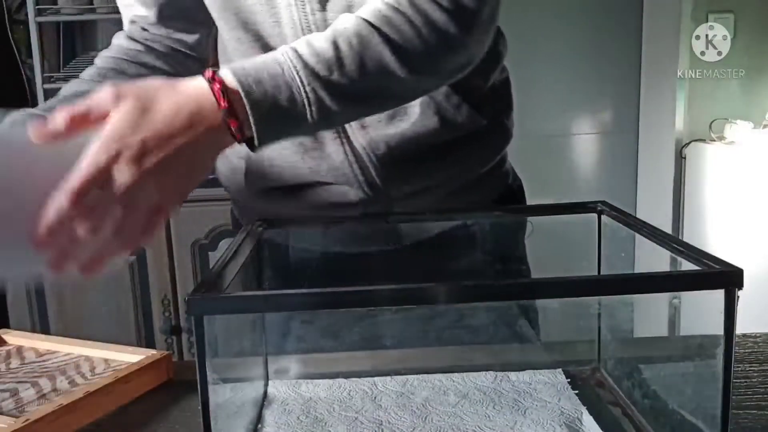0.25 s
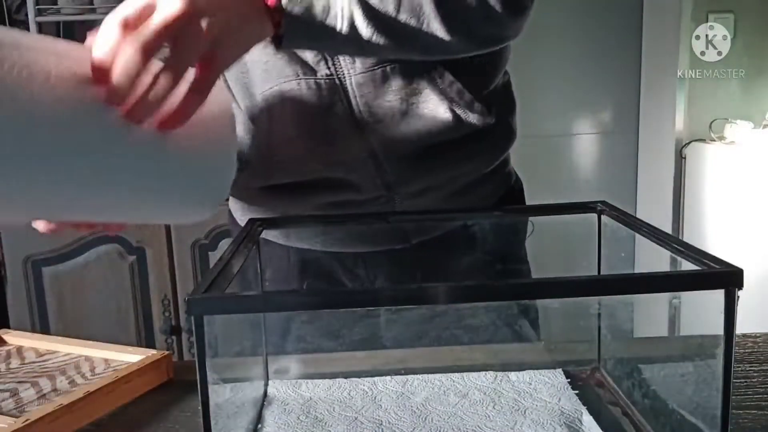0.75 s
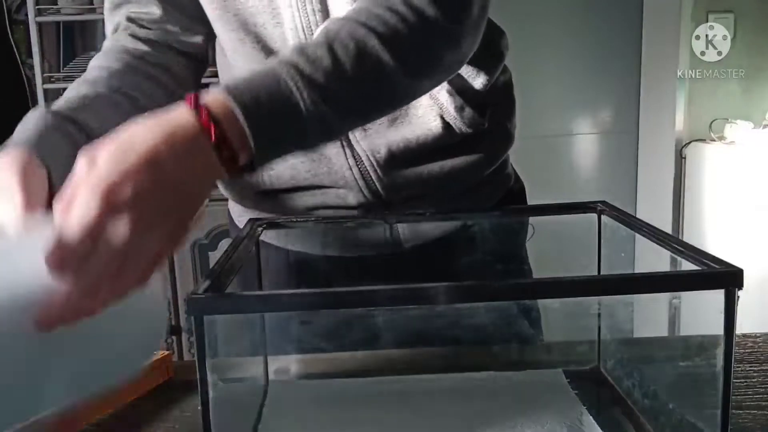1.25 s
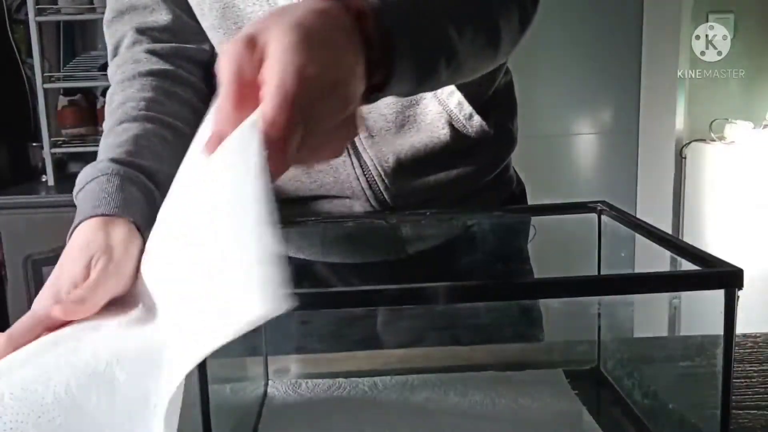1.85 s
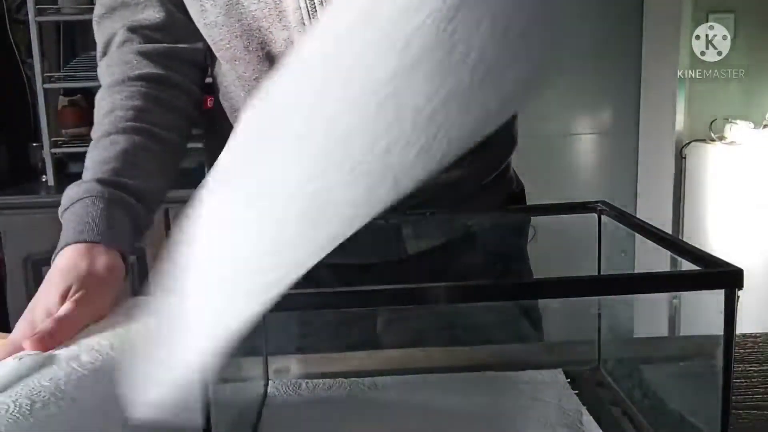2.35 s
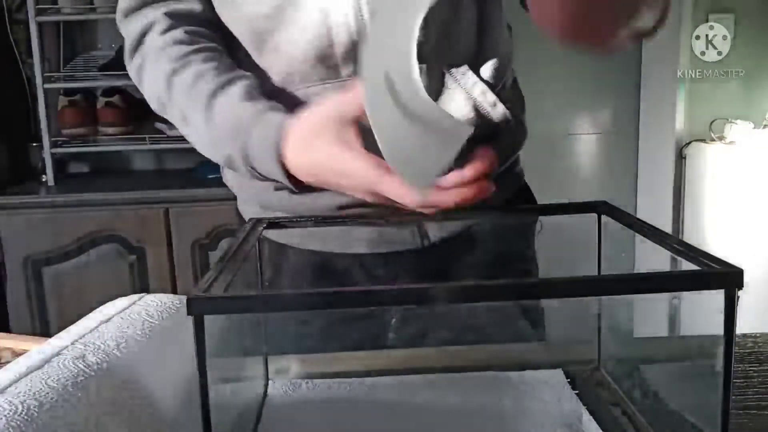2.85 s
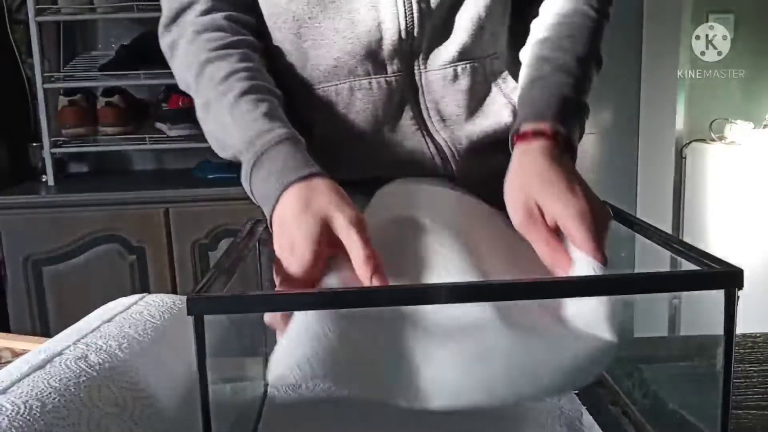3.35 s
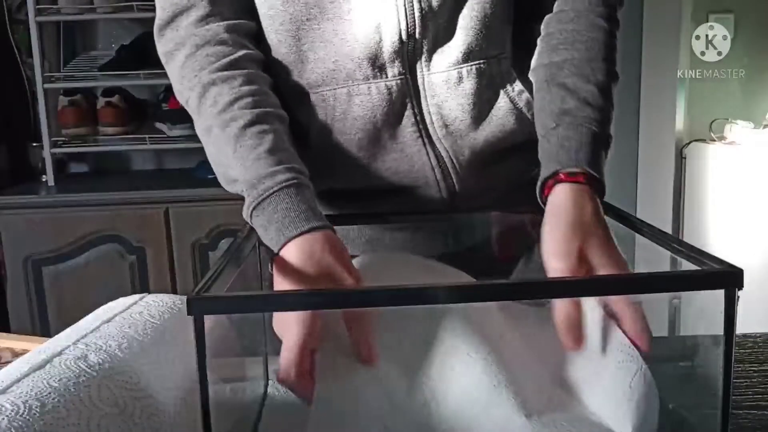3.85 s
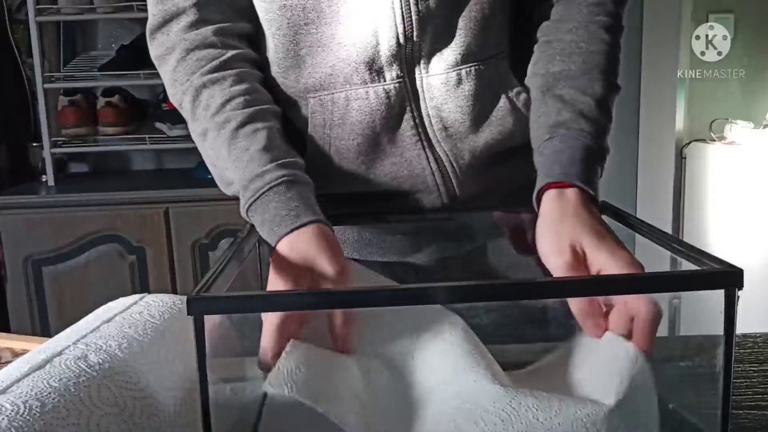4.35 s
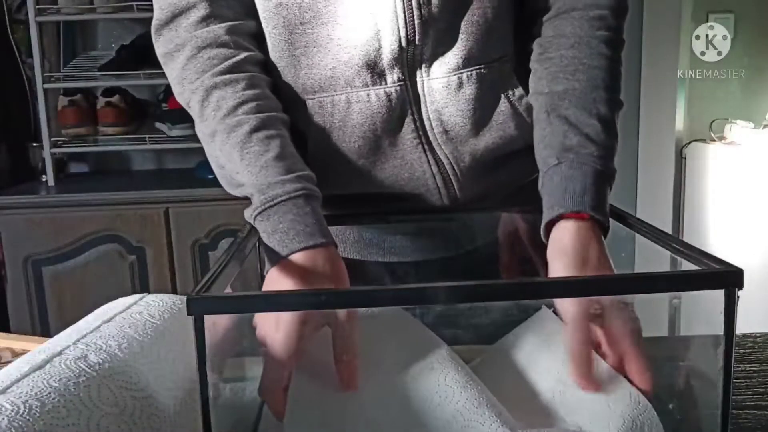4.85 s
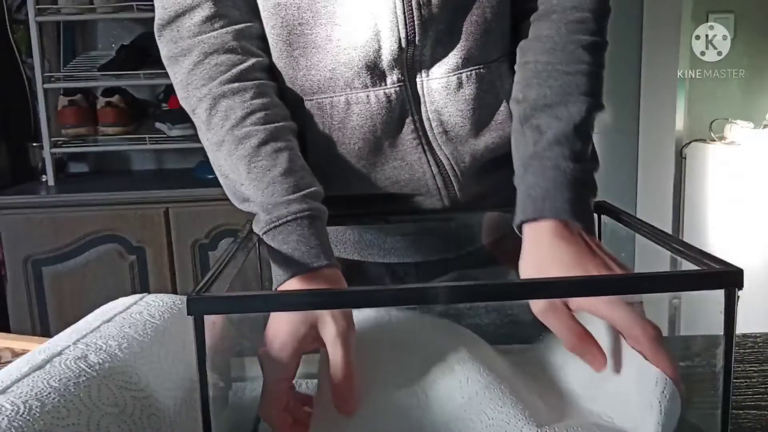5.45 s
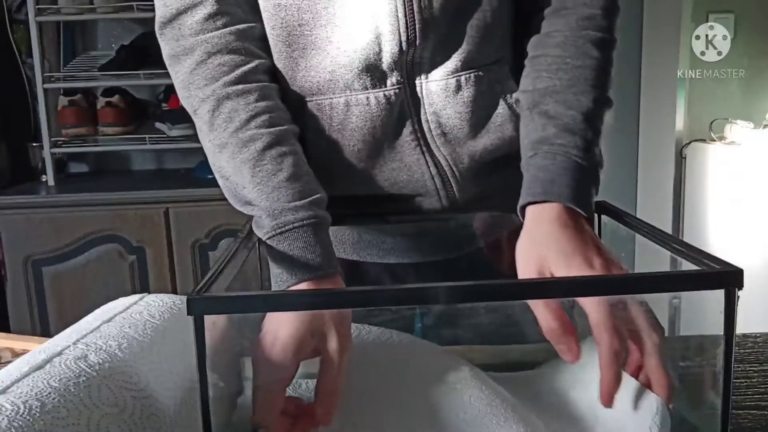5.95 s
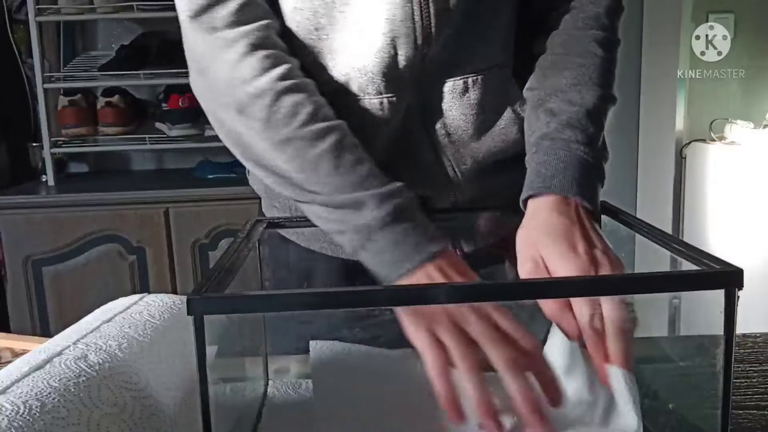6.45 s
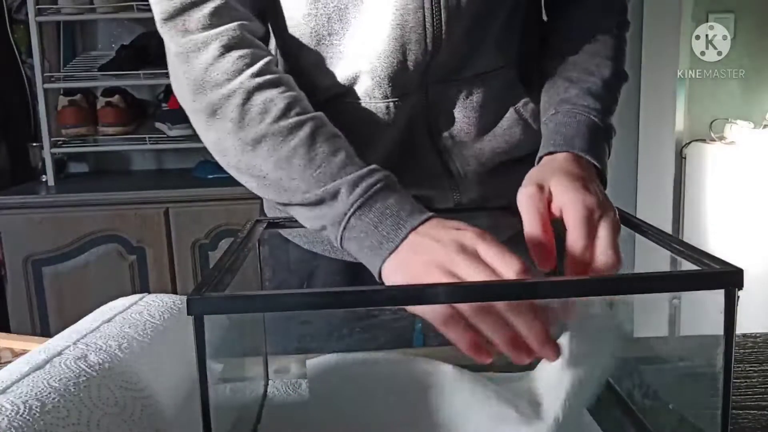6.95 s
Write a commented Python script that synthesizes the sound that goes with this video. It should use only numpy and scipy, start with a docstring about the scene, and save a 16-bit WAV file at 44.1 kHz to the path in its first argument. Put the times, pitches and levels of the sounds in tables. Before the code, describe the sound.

Close phone microphones pick up soft paper handling over faint low room noise. First the towel roll stirs and hisses, with a soft thud of its wooden tray toward the left. The roll is then pulled, the tray rattling woodenly against the table, and a sheet snaps off along its perforations. Quieter rustling, scuffing and patting follow inside a resonant glass tank, with occasional ticks and one tiny squeak.

```python
"""Over soft room noise, the paper of a towel roll stirs: it rubs, flaps and hisses, and its tube rings.
From early on, its wooden tray knocks on the table (ticks, cracks, thuds, table ring) and booms in gliding low notes.
A sheet rips off, each snapping bridge shaking the taut paper; creases tick before and, more often, after.
The sheet is spread and patted into a glass tank: soft rustling, low pane notes and one tiny finger squeak.
All is heard in a small room from close by, through the two microphones of a phone."""
import sys
import numpy as np
from scipy import signal
from scipy.fft import rfft, irfft, next_fast_len
from scipy.io import wavfile
from scipy.ndimage import uniform_filter1d

SR = 44100
rng = np.random.default_rng(int(sys.argv[2]) if len(sys.argv) > 2 else 0)


def dump(signal):
    """Clip the signal to [-1, 1] and save it as 16-bit WAV at the path in sys.argv[1]."""
    limited = np.clip(np.atleast_2d(signal).T, -1, 1)
    pcm = np.round(limited * 32767).astype(np.int16)
    wavfile.write(sys.argv[1], SR, pcm)


N = 316990
TIME = np.arange(N) / SR  # seconds, whole scene
RING = TIME[:SR * 3 // 5]  # seconds, one ringing sound

# perforation bridges that snap: t/s, relative level/dB
BRIDGE_SNAPS = [(2.283, -29), (2.2838, -25.5), (2.2878, -28.5), (2.2901, -26.5), (2.2925, -34),
                (2.2968, -28), (2.3001, -34), (2.3027, -28.5), (2.3178, -27), (2.3262, -25.5),
                (2.3286, -31), (2.3362, -28.5), (2.3389, -26.5), (2.342, -31.5), (2.3445, -26),
                (2.3502, -29.5), (2.354, -24.5), (2.356, -33)]
# tone colour of a dry paper click: f/Hz, level/dB
CLICK_COLOUR = [(1000, -61.5), (3000, -5), (6000, -10), (15000, 0.5)]
# tone colour of flapping or patted paper: f/Hz, level/dB
FLAP_COLOUR = [(40, -31.5), (90, -16.5), (160, 1), (310, 3), (400, -6), (560, -4.5), (1000, -13.5),
               (3000, -38)]


def undb(db):
    """Turn decibels into a gain."""
    return 10 ** (np.asarray(db) / 20)


def unit(x):
    """Scale so that the energy, averaged over the channels, is one."""
    energy = np.sum(x ** 2, axis=-1)
    return x / np.sqrt(np.mean(energy))


def level(x, db):
    """Set the rms level, taken over all channels together."""
    return x * undb(db) / np.sqrt(np.mean(x ** 2))


def on_log_axis(hz, points):
    """Read a curve of (Hz, value) points along a log-frequency axis."""
    f, value = np.transpose(points)
    return np.interp(np.log(np.maximum(hz, 1)), np.log(f), value)


def colour(x, points):
    """Filter to a curve of (Hz, dB) points, with no sound before its cause."""
    n = 2 * next_fast_len(x.shape[-1] // 2 + 2048)
    gain = undb(on_log_axis(np.fft.rfftfreq(n, 1 / SR), points))
    # folding the cepstrum forward in time makes the filter minimum-phase
    cepstrum = irfft(np.log(gain))
    cepstrum[1:n // 2] *= 2
    cepstrum[n // 2 + 1:] = 0
    response = np.exp(rfft(cepstrum))
    return irfft(rfft(x, n) * response)[..., :x.shape[-1]]


def resonate(x, hz, width_hz):
    """Let one resonance ring along with a sound."""
    b, a = signal.iirpeak(hz, hz / width_hz, fs=SR)
    return signal.lfilter(b, a, x)


def convolve(x, response):
    """Give every instant of a sound the same stereo echo pattern."""
    return signal.fftconvolve(np.atleast_2d(x), response, axes=-1)[:, :x.shape[-1]]


def add(out, s, x):
    """Mix a sound in at time s, in seconds."""
    i = max(int(s * SR), 0)
    out[..., i:i + x.shape[-1]] += x[..., :N - i]


def fade(t60):
    """Die away exponentially, by 60 dB in t60 seconds."""
    return undb(-60 * RING / t60)


def diffuse(n):
    """Noise from all sides at two spaced microphones: alike in the bass, unrelated in the treble."""
    mic_gap_m, sound_speed = 0.29, 343  # m, m/s
    likeness = np.sinc(2 * np.fft.rfftfreq(n, 1 / SR) * mic_gap_m / sound_speed)
    shares = np.sqrt([(1 + likeness) / 2, (1 - likeness) / 2])
    mid, side = rfft(rng.standard_normal((2, n))) * shares
    return irfft([mid + side, mid - side], n)


def burst(t60):
    """A dense stereo noise burst that dies away, with unit energy."""
    return unit(diffuse(len(RING)) * fade(t60))


def room(x, early_db, late_db, early_t60=0.043):
    """Direct sound, quick reflections off table and glass, and a tail whose highest treble dies first."""
    # how long the room rings: f/Hz, t60/s
    ring_times = [(150, 0.36), (600, 0.29), (2500, 0.33), (7000, 0.32), (14000, 0.12)]
    noise, hz = rfft(diffuse(len(RING))), np.fft.rfftfreq(len(RING), 1 / SR)
    centres, t60s = np.transpose(ring_times)
    tail = 0
    for share, t60 in zip(np.eye(len(centres)), t60s):
        band = noise * on_log_axis(hz, np.c_[centres, share])  # neighbouring bands overlap
        tail = tail + irfft(band, len(RING)) * fade(t60)
    late = unit(tail * (1 - fade(0.012)))  # the tail swells in
    early = unit(diffuse(len(RING)) * fade(early_t60) * (RING > .001))
    response = undb(early_db) * early + undb(late_db) * late
    response[:, 0] += 1  # direct sound
    return convolve(x, unit(response))


def from_left(x, lag_s=0.00022):
    """Sound from the left reaches the right microphone a little later."""
    return np.array([x[0], np.interp(TIME - lag_s, TIME, x[1])])


def grains(per_s, spread_db):
    """Little slips at random moments, of uneven size and either sign."""
    struck = rng.random(N) < per_s / SR
    sign = rng.choice([-1, 1], N)
    size = undb(spread_db * np.minimum(rng.exponential(size=N), 4))
    return struck * sign * size


def room_tone():
    """The quiet room: a steady, mostly low noise from all sides."""
    # tone colour of the room: f/Hz, level/dB
    tone_colour = [(30, -36), (60, -11), (110, 0), (300, -7.5), (600, -13.5), (1500, -14.5), (3300, -20),
                   (4500, -23.5), (15000, -27.5)]
    return level(colour(diffuse(N), tone_colour), -69.5)


def movements(rows, held, creep_db, creep_fade_s=.04):
    """Gains of rubbing, flapping and hiss: moves speed up and die away over a slow creep of held paper."""
    rise, bluntness = 0.44, 1.26  # share of a move spent speeding up; shape of its peak

    def powers(rub_db, flap_db, hiss_db):
        """Turn rubbing level and the two levels relative to it into powers."""
        return undb(rub_db + np.array([[0], [flap_db], [hiss_db]])) ** 2

    holding = 0
    for start, end in held:
        inside = np.minimum(TIME - start, end - TIME)
        holding = holding + np.clip(inside / creep_fade_s + .5, 0, 1)
    power = powers(*creep_db) * holding
    for s, length, *levels in rows:
        near = np.abs(TIME - s) < 2 * length
        away = (TIME[near] - s) / length
        distance = np.maximum(-away / rise, away / (1 - rise))
        power[:, near] += powers(*levels) * np.exp(-distance ** bluntness)
    return np.sqrt(power)


def catching(per_s=40, depth_db=1.5):
    """The paper catches and lets go as it slides: a quick, uneven wavering of gain."""
    steps = rng.standard_normal(2000)
    return undb(depth_db * np.interp(TIME * per_s, np.arange(len(steps)), steps))


def rustle(spectrum, db, per_s, spread_db, direct_db=-6, scatter_s=0.011):
    """Stick-slip grains heard directly and as a short scatter that changes as the paper moves."""
    slips = grains(per_s, spread_db)
    energy = signal.lfilter([1], [1, -np.exp(-1 / (scatter_s * SR))], slips ** 2)
    scatter = level(diffuse(N) * np.sqrt(energy), 0)
    return level(colour(level(slips, direct_db) + scatter, spectrum), db)


def in_tank(x, dry_db=-2):
    """Rubbing inside the tank sets its glass and air ringing."""
    # ringing tones of the tank: f/Hz, width/Hz, level/dB
    tank_tones = [(294.5, 33, 10), (1121, 27, 0), (1730, 45, -3)]
    out = undb(dry_db) * x
    for hz, width, db in tank_tones:
        out = out + undb(db) * resonate(x, hz, width)
    return out


def paper(core_hz=1120, core_width_hz=130, core_db=1, near_treble_db=3):
    """Soft paper flaps in the bass, rubs in the middle and hisses with its fibres on top."""
    # the roll's paper stirs and is pulled off: t/s at the fastest, length/s, rubbing level/dB, flapping
    # relative to rubbing/dB, fibre hiss relative to rubbing/dB
    roll_moves = [(0.012, 0.04, -64, 9, 5), (0.085, 0.072, -62, -1, -14), (0.513, 0.015, -59.5, 0, 4),
                  (0.69, 0.046, -68, -7, 9), (0.812, 0.033, -66, 7, 4), (0.92, 0.047, -60, -5, 3.5),
                  (0.985, 0.065, -57, 0.5, -11), (1.062, 0.096, -61.5, 1.5, 1.5),
                  (1.355, 0.079, -70.5, 15, 10), (1.412, 0.027, -75, -8, 11.5),
                  (1.495, 0.075, -51, 10, -0.5), (1.745, 0.082, -49, 16, -5), (2.005, 0.17, -56.5, 4.5, -2),
                  (2.2, 0.046, -66, 11, 0), (2.315, 0.055, -50, 5.5, -0.5)]
    # hands push and smooth the sheet in the tank: the same columns
    strokes = [(2.598, 0.041, -66, 6.5, -2.5), (2.718, 0.05, -59, 6, -4.5), (3.02, 0.056, -71.5, 17, 2),
               (3.075, 0.065, -64.5, -3, -3), (3.22, 0.22, -75.5, 13, 8), (3.375, 0.062, -60, 8, -5),
               (3.46, 0.074, -61, 10.5, -0.5), (3.58, 0.096, -77, 17, -11), (3.89, 0.5, -68.5, 7.5, -6.5),
               (4.095, 0.068, -59.5, 2, -11), (4.15, 0.067, -67.5, 16.5, -6), (4.21, 0.06, -62, -4, -3),
               (4.39, 0.15, -65.5, 7, -2), (4.645, 0.038, -60, 4, -6), (4.82, 0.17, -63, 5, -4.5),
               (5.21, 0.046, -63.5, -0.5, -2), (5.37, 0.26, -64, 0.5, -3.5), (5.73, 0.096, -66, -2, -2.5),
               (5.95, 0.2, -66.5, -20, -8.5), (6.19, 0.078, -65.5, -5, -2), (6.32, 0.084, -66, 2, -2),
               (6.425, 0.044, -55.5, -11, -16), (6.535, 0.055, -65, 1, -4.5),
               (6.665, 0.069, -62, 2.5, -4.5), (6.738, 0.062, -61.5, 5.5, -1.5), (7.108, 0.036, -66, 2, 3)]
    # spans when roll and sheet are held: start t/s, end t/s
    roll_held = [(0, 0.19), (0.52, 2.3)]
    sheet_held = [(2.42, 7.15)]
    # creep of held paper: rubbing level/dB, flapping relative/dB, fibre hiss relative/dB
    roll_creep = (-67.5, -0.5, -2.5)
    tank_creep = (-72, 4.5, -6)
    # tone colours of roll, sheet in the tank, fibres and light scuff: f/Hz, level/dB
    roll_colour = [(300, -19), (550, -4.5), (720, -5), (950, -1), (1100, -3), (1280, -5.5), (2200, -4.5),
                   (3300, -11.5), (4500, -18.5), (9000, -21)]
    tank_colour = [(300, -30), (580, -5), (850, -4), (1150, -1.5), (1350, -2.5), (1750, -4), (2200, -11),
                   (4500, -30)]
    fibre_colour = [(1500, -35.5), (3000, -0.5), (4000, -3), (5200, -3), (6700, -1.5), (8500, -5.5),
                    (15000, -1.5)]
    scuff_colour = [(900, -38), (1750, 0), (2300, 1.5), (3300, 0.5), (4000, -10.5), (9000, -30)]

    roll_rub, roll_flap, roll_hiss = movements(roll_moves, roll_held, roll_creep) * catching()
    tank_rub, tank_flap, tank_hiss = movements(strokes, sheet_held, tank_creep) * catching()
    flapping = rustle(FLAP_COLOUR, db=-5.0, per_s=280, spread_db=-1.0, direct_db=-3.0)
    flap = (roll_flap + tank_flap) * flapping
    fibres = rustle(fibre_colour, db=-0.5, per_s=3600, spread_db=8.0, direct_db=-14.0)
    # the roll is handled close to the microphones, so its hiss is brighter
    near_hiss = colour(roll_hiss * fibres, [(6000, -0.91), (12000, near_treble_db)])
    hiss = tank_hiss * fibres + near_hiss
    roll = roll_rub * rustle(roll_colour, db=0.5, per_s=1500, spread_db=4.5, direct_db=1.5)
    core = undb(core_db) * resonate(roll, core_hz, core_width_hz)  # the cardboard tube rings
    rub = in_tank(tank_rub * rustle(tank_colour, db=-0.5, per_s=500, spread_db=2.5, direct_db=1))
    # a light scuff grows with both the pressure of the rub and the speed of the slide
    scuffing = rustle(scuff_colour, db=-3.5, per_s=1800, spread_db=1.5, direct_db=-7)
    scuff = np.sqrt(tank_rub * tank_hiss) * scuffing
    return flap + hiss + from_left(roll + core) + rub + scuff


def tray(thud_db=16.5, crack_db=19, tick_db=-6, ring_db=-16, ring_t60=0.21, thud_t60=0.06,
         crack_t60=0.04, strike_db=-5, contact_hz=3200, octave_db=11):
    """Knocks tick, crack and thud on wood and set the table ringing; soft knocks are duller."""
    # the tray knocks on the table: t/s, relative level/dB, hardness (crack relative to thud)/dB
    knocks = [(0.201, -32.5, -7.5), (0.211, -25, -34), (0.223, -27, -30.5), (0.235, -26, -33),
              (0.271, -27, -46.5), (1.467, -49, -9), (1.48, -11, -9.5), (1.485, -14.5, -13.5),
              (1.519, -28, -20), (1.587, -32, -2), (1.598, -14.5, -13.5), (1.603, -19, 1.5),
              (1.609, -18.5, -2.5), (1.617, -14.5, -10), (1.628, -15.5, -14), (1.639, -24, -15),
              (1.657, -20.5, -4.5), (1.667, -18.5, -9), (1.698, -20.5, -9.5), (1.71, -17.5, -8),
              (1.735, -28.5, -9), (1.756, -21.5, -13), (1.769, -24, -8), (1.785, -23, -28.5),
              (1.828, -27.5, -42)]
    # ringing tones of the table with the tank on it: f/Hz, level/dB
    table_tones = [(172, -2), (235, -8), (257, 0), (340, -6), (412, 3), (486, 5), (654, 0), (730, -1),
                   (872, -5), (1060, -1), (1156, -8), (1395, -10), (1660, -10), (1968, -10)]
    # tone colours of the wooden tray's thud and crack: f/Hz, level/dB
    thud_colour = [(40, -39.5), (80, -26), (160, -7.5), (245, -3.5), (330, -1.5), (500, 1.5), (780, -5.5),
                   (1100, -20), (2000, -20), (5000, -57.5)]
    crack_colour = [(300, -30.5), (700, 7.5), (1050, 4.5), (1500, 1), (2200, -0.5), (3100, -8), (3900, -17),
                    (8000, -28.5), (15000, -35)]
    wood, ringing = np.zeros((2, N)), np.zeros(N)
    modes = np.array([undb(db) * np.sin(2 * np.pi * hz * RING) * fade(ring_t60) for hz, db in table_tones])
    modes = colour(modes, [(50, -39), (140, -3.0)])  # the table's ringing tones carry no deep bass
    for s, db, hard_db in knocks:
        edge = contact_hz * 2 ** (hard_db / octave_db)  # a long, soft contact excites only the low end
        contact = [(edge, 0), (2 * edge, -12), (8 * edge, -40)]
        thud = undb(thud_db) * unit(colour(colour(burst(thud_t60)[0], thud_colour), contact))
        strike = undb(strike_db) * (RING == 0)
        crack = undb(crack_db) * unit(colour(burst(crack_t60) + strike, crack_colour))
        tick = undb(tick_db) * unit(colour(burst(.015), CLICK_COLOUR))
        add(wood, s, undb(db) * (thud + undb(hard_db) * (crack + tick)))
        # every contact point weights the modes differently
        table = undb(2 * rng.standard_normal(len(modes))) @ modes
        add(ringing, s, undb(db + ring_db) * colour(table, contact))
    return from_left(room(wood, early_db=-13.5, late_db=-3.5) + ringing)


def booms(swell_s=0.0066, glide_share=.6):
    """The tray's thin bottom swells into a low note that sinks as the load on it shifts, then dies."""
    # low notes: t/s, relative level/dB, first f/Hz, last f/Hz, length/s
    low_notes = [(0.207, -32, 275, 145, .08), (1.479, -20.5, 190, 160, .014),
                 (1.612, -21.5, 250, 180, .018)]
    out = np.zeros(N)
    for s, db, first_hz, last_hz, length in low_notes:
        glide = np.exp(-(RING / (glide_share * length)) ** 2)
        hz = last_hz + (first_hz - last_hz) * glide
        swing = (1 - np.exp(-RING / swell_s)) * np.exp(-(RING / length) ** 4)
        add(out, s, undb(db) * swing * np.sin(2 * np.pi * np.cumsum(hz) / SR))
    return from_left(room(out, early_db=-20, late_db=-14))


def creases(flick_db=14, skirt_db=-11, flick_t60=0.014):
    """A crease flicks over with a short tick of noise centred on one pitch."""
    # flicks: t/s, relative level/dB, pitch f/Hz
    flicks = [(0.484, -43.5, 11000), (1.977, -38.5, 1100), (2.183, -43, 880), (2.52, -58, 1180),
              (2.716, -41.5, 1080), (3.28, -42, 7360), (4.059, -46, 1500), (4.075, -51, 1500),
              (4.089, -43, 1100), (4.639, -46, 1200), (4.765, -51, 1400), (6.311, -55, 1400),
              (6.642, -46, 1290), (6.714, -44, 1300), (6.736, -43.5, 1270), (6.903, -44, 1430)]
    out = np.zeros((2, N))
    for s, db, hz in flicks:
        below = [(hz / 8, 2 * skirt_db), (hz / 2, skirt_db / 2)]
        above = [(hz * 1.5, skirt_db / 2), (hz * 3, 3 * skirt_db)]
        tick = colour(burst(flick_t60), below + [(hz, 0)] + above)
        add(out, s, undb(db + flick_db) * unit(tick))
    return room(out, early_db=-8, late_db=-9)


def parting_fibres(db=-43, per_s=650, spread_db=3):
    """Single fibres crackle between the first and the last bridge."""
    tearing = (TIME > BRIDGE_SNAPS[0][0]) & (TIME < BRIDGE_SNAPS[-1][0] + .004)
    return convolve(tearing * level(grains(per_s, spread_db), db), burst(.002))


def rip(snap_db=15, sheet_db=29, sheet_t60=0.013):
    """The tear runs along the perforation: bridges snap one by one, each shaking the taut sheet."""
    # tone colour of the taut sheet: f/Hz, level/dB
    sheet_colour = [(40, -31), (90, -10), (170, 1.5), (280, 1), (420, 3), (750, 0.5), (1100, 1.5),
                    (1600, -8.5), (2900, -10), (4000, -17.5), (15000, -34)]
    snaps, shakes = np.zeros((2, N)), np.zeros((2, N))
    for s, db in BRIDGE_SNAPS:
        add(snaps, s, undb(db + snap_db) * burst(.004))
        add(shakes, s, undb(db + sheet_db) * burst(sheet_t60))
    bright = room(colour(snaps + parting_fibres(), CLICK_COLOUR), early_db=-4, late_db=-6)
    return from_left(bright + room(colour(shakes, sheet_colour), early_db=2.5, late_db=-5.5))


def bumps(tone_db=4, pad_db=6, overtone=2.46, overtone_db=-11):
    """A soft push rings a low pane note under a dull paper pat; firmer pushes bring out an overtone."""
    # fingers and paper bump the tank: t/s, relative level/dB, pitch f/Hz, t60/s
    pushes = [(2.687, -44.5, 650, 0.038), (2.761, -47, 594, 0.018), (3.369, -55, 212, 0.055),
              (3.861, -50.5, 165, 0.065), (4.117, -47, 440, 0.035), (4.435, -51, 260, 0.055),
              (4.589, -52, 189, 0.099), (6.022, -48, 195, 0.084), (6.117, -53, 170, 0.094),
              (6.251, -43, 200, 0.06), (6.699, -51, 307, 0.064)]
    out, firmest = np.zeros((2, N)), np.array(pushes)[:, 1].max()
    for s, db, hz, t60 in pushes:
        upper = np.sin(2 * np.pi * overtone * hz * RING) * fade(2 * t60)
        upper = undb(overtone_db + db - firmest) * upper
        pane = np.sin(2 * np.pi * hz * RING) * fade(t60) + upper
        build = 1 - np.exp(-RING * hz)  # the note builds over about one cycle
        pat = unit(colour(burst(0.065), FLAP_COLOUR))
        add(out, s, undb(db) * (undb(tone_db) * pane * build + undb(pad_db) * pat))
    return room(out, early_db=-16, late_db=-14)


def squeak(waver=.015):
    """A finger sticks and slips on the glass, heard as a short, unsteady, falling chirp."""
    # the squeak: t/s, level/dB, first f/Hz, last f/Hz, length/s
    chirp = (4.068, -60, 10900, 9600, .016)
    out = np.zeros(N)
    s, db, first_hz, last_hz, length = chirp
    along = np.minimum(RING / length, 1)
    unsteady = level(uniform_filter1d(rng.standard_normal(len(RING)), size=30), 0)
    hz = (first_hz + (last_hz - first_hz) * along) * (1 + waver * unsteady)
    add(out, s, undb(db) * np.sin(np.pi * along) * np.sin(2 * np.pi * np.cumsum(hz) / SR))
    return out


def scene():
    """All the handling over the quiet noise of the room."""
    rustling = room(paper() + squeak(), early_db=-5, late_db=-12)
    return tray() + booms() + rip() + rustling + bumps() + creases() + room_tone()


def record(dry):
    """Each microphone colours its own side; everything above 15.7 kHz is steeply cut."""
    # colour of the two microphones, the left port resonates: f/Hz, level/dB
    left_mic = [(3000, 3.5), (8500, -1), (10000, 4), (11200, 5.5), (11900, 11.5), (13200, 4.5), (15000, 1)]
    right_mic = [(3000, 3), (7000, 4.5), (9000, 0), (11500, -6), (13000, -1), (15000, -13)]
    ports = np.array([colour(dry[0], left_mic), colour(dry[1], right_mic)])
    top_cut = signal.ellip(10, .2, 80, 15700, fs=SR, output="sos")
    return signal.sosfilt(top_cut, ports)


dry = scene()
out = record(dry)
dump(out)
```